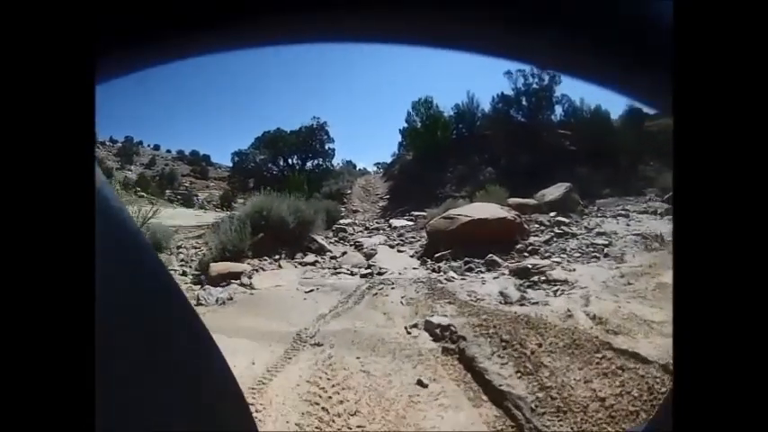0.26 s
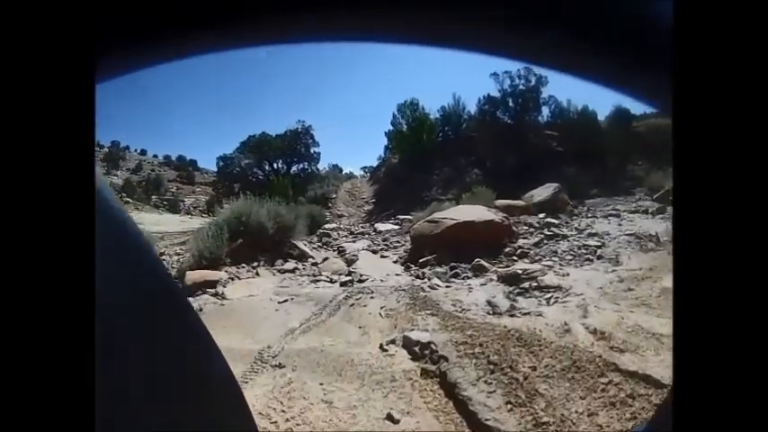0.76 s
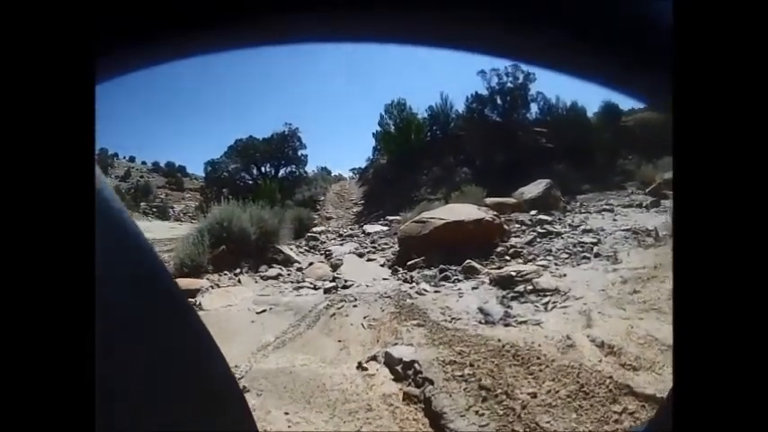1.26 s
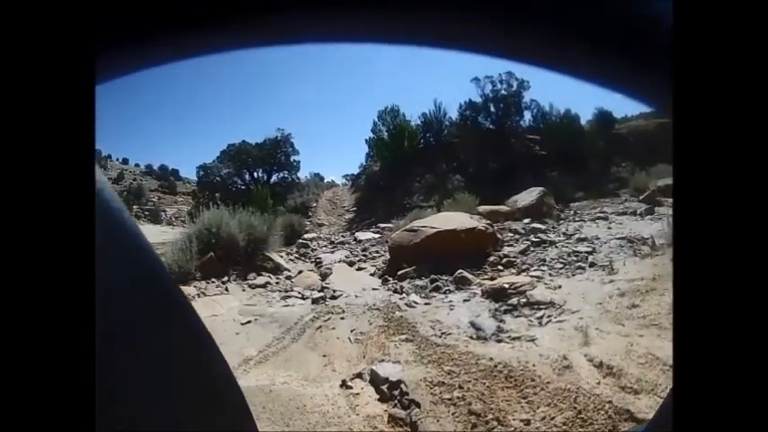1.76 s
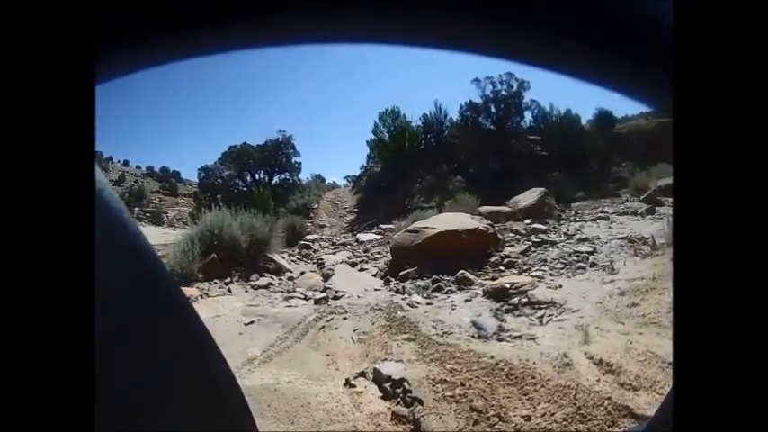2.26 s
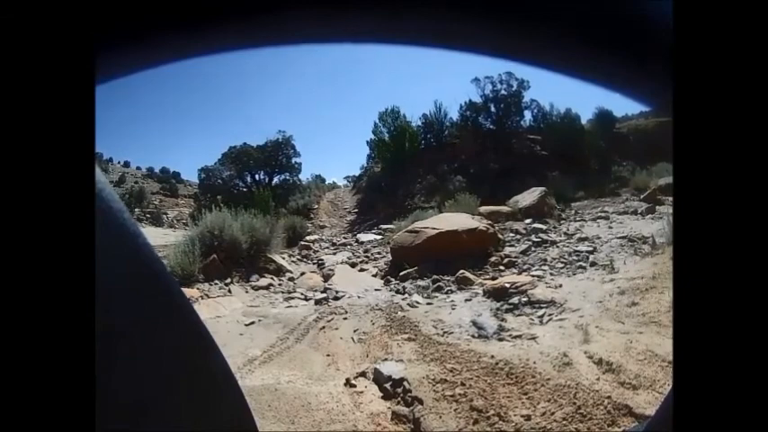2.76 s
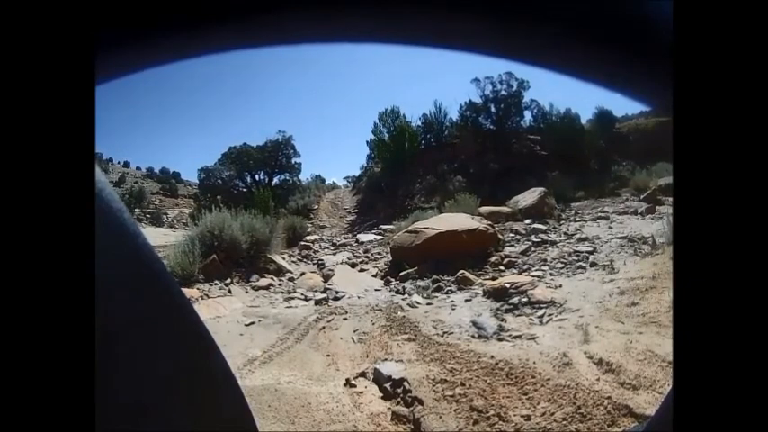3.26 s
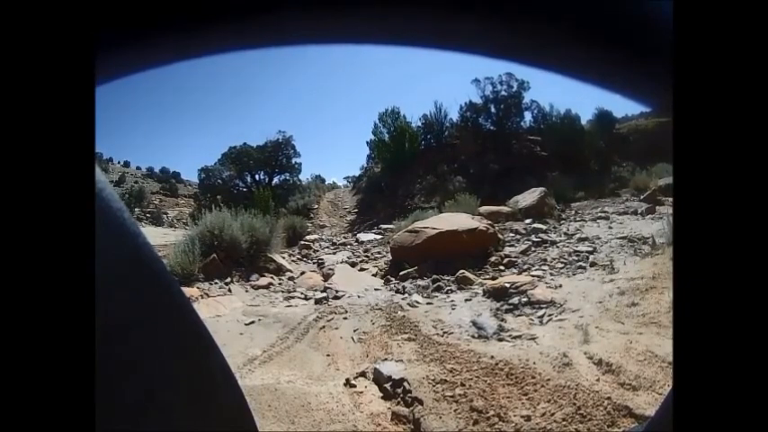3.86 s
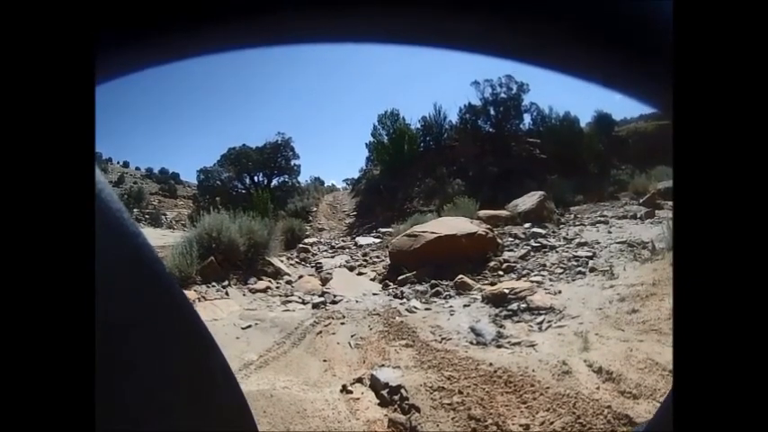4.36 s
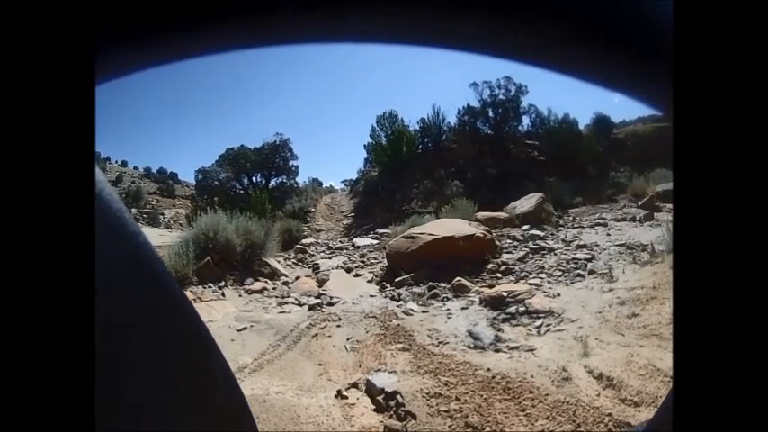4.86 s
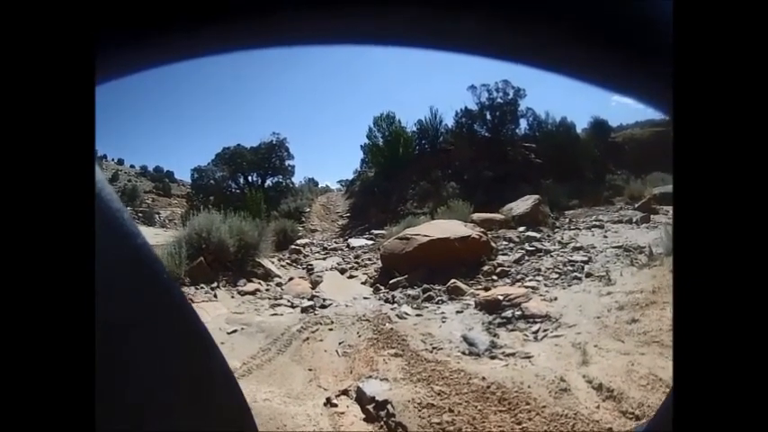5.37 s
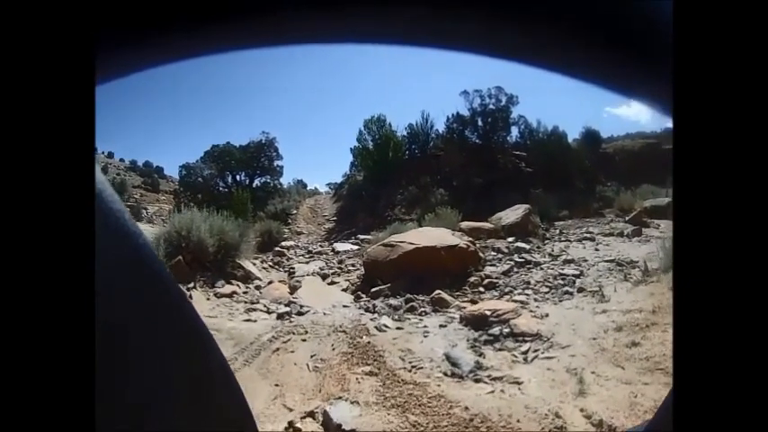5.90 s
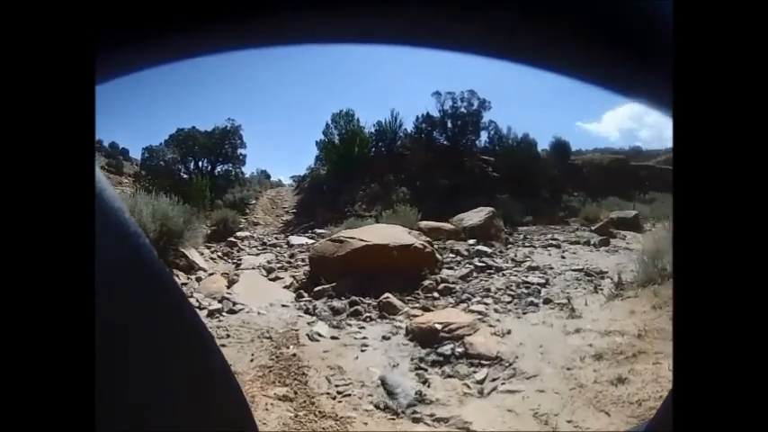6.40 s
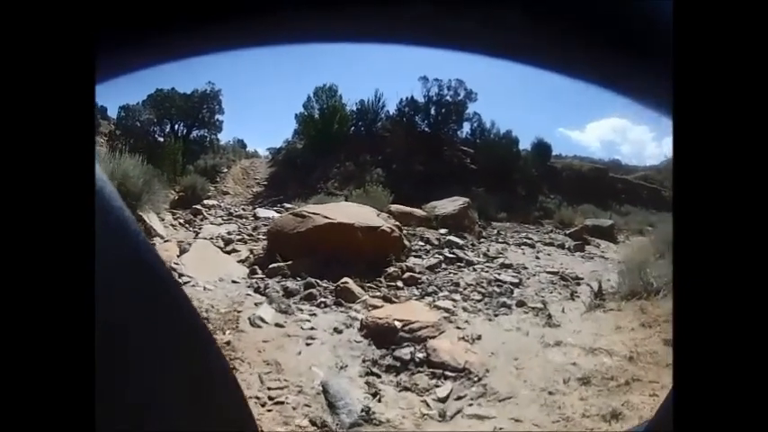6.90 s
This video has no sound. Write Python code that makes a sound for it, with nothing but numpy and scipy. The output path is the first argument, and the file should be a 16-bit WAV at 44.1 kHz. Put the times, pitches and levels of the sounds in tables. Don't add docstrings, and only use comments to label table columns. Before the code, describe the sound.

From 0 to about 3.6 seconds a two-cylinder off-road engine idles slowly, close and muffled: soft low exhaust throbs around 50 Hz, slightly uneven, over unsteady gas rumble. Valve gear clatters twice each cycle, tappets tick finely, air hisses faintly, and a body panel hums in short swells around 300 Hz. At 3.7 the engine stumbles and revs, reaching full pull by 4.3, about half again higher in pitch and far louder, with thick, compressed bass. A loose metal part rattles in quick dry strikes from about 4 seconds, growing brighter after 6.2. Small stones tick on metal at about 6.1 and, very faintly, 6.35. From 6.25 the speed falls quickly; the throbs turn weak and lumpy, with a few stray rattles, settling to low idle by 7.1. The small microphone is sealed in a housing, outdoors, with only faint self-noise.

```python
import sys
import numpy as np
from scipy import signal
from scipy.fft import rfft, irfft, next_fast_len
from scipy.io import wavfile
from scipy.ndimage import uniform_filter1d, map_coordinates

SR = 44100
rng = np.random.default_rng(int(sys.argv[2]) if len(sys.argv) > 2 else 0)


def to_linear_factor(level_db):
    exponent = np.asarray(level_db, float) / 20
    return 10 ** exponent


def wav_record(signal):
    frames = np.transpose(np.atleast_2d(signal))
    bounded = np.clip(frames, -1, 1)
    quanta = np.round(bounded * 32767).astype(np.int16)
    wavfile.write(sys.argv[1], SR, quanta)


N = 314874


def unit(x):
    return x / np.sqrt(np.mean(x ** 2) + 1e-20)


def curves(rows):
    t_s, *columns = np.transpose(rows)
    return [np.interp(np.arange(N) / SR, t_s, column) for column in columns]


def wobble(rate_hz):
    coarse = np.arange(0, N + 64, 64)
    knots = coarse * np.clip(rate_hz, 0, 50) / SR
    return np.interp(np.arange(N), coarse, map_coordinates(rng.standard_normal(400), [knots]))


def resonance_db(f_hz, modes):
    return sum(top_db / (1 + ((f_hz - centre) / width * 2) ** 2) for centre, width, top_db in modes)


def spell(start_s, length_s):
    return np.exp(-((np.arange(N) / SR - start_s) / length_s * 2) ** 2)


def bump(cycle, angle, rise, fall):
    u = (cycle - angle) % 1
    return (1 - np.exp(-u / rise)) * np.exp(-u / fall)


# t/s, speed/Hz
SPEED = [(0.0, 13.28), (0.72, 12.561), (1.0, 12.981), (1.84, 12.894), (2.1, 12.409), (2.98, 12.97),
         (3.4, 12.675), (3.7, 13.768), (4.1, 18.355), (4.34, 19.1), (4.84, 18.978), (5.42, 20.058),
         (5.68, 19.945), (6.2, 20.136), (6.3, 19.002), (6.4, 16.556), (6.82, 13.072), (7.14, 11.961)]


def engine_speed():
    return curves(SPEED)[0]


# t/s, load/0-1, firing unevenness/dB
THROTTLE = [
    (0, 0, 1.6),
    (3.5, 0, 1.6),
    (4.05, 1, .6),
    (4.3, 1, .4),
    (6.25, 1, .4),
    (6.37, .5, 2.5),
    (6.55, .3, 3),
    (7.14, 0, 2.5),
]


def throttle():
    load, rough_db = curves(THROTTLE)
    return np.clip(load, 0, 1), rough_db


# t/s, push/dB
PUSH = [(0, -23), (.25, -29), (.72, -25), (1.38, -30.5), (1.9, -29.5), (2.07, -23.5), (2.3, -25),
        (2.43, -29), (2.6, -24.5), (3.12, -33), (3.3, -25.5), (3.6, -34), (4.12, -14.5), (5.5, -11.5),
        (6.22, -11.5), (6.4, -22), (6.75, -23.5), (7.14, -35)]


def firing_push():
    push_db = curves(PUSH)[0]
    return push_db, push_db + 27


def noise_db(load, idle_db, per_doubling_db, load_db, push_share, surge_db):
    idle_hz, shudder_lag_s = 12.8, 0.1
    speed, t = uniform_filter1d(engine_speed(), size=SR // 8), np.arange(N) / SR
    shudder = np.interp(t - shudder_lag_s, t, load * abs(np.gradient(speed)) * SR)
    running_db = idle_db + per_doubling_db * np.log2(speed / idle_hz) + load_db * load
    return running_db + push_share * firing_push()[1] + surge_db * shudder


def rumble_db(load):
    return noise_db(load, -37.5, 4.5, 3.5, 0.088, 0.32)


def hiss_db(load):
    return noise_db(load, -65, 11, 3.5, 0.02, 0.1)


# order, idle level/dB, share of idle push, level over push under load/dB
THROB = [(2, -43, .1, -9.7), (3, -41, .2, -16), (4, -27, 1, -13), (5, -41, .2, -21)]
# f/Hz, width/Hz, level/dB
PIPE = [(41, 16, 9), (77.5, 13, 9), (100, 8, 5)]
# t/s, length/s, order, level/dB
ORDER_SWELLS = [(.1, .25, 3, -33), (.4, .9, 5, -35), (1.4, .7, 5, -38), (1.7, .5, 3, -35), (2.62, .15, 3, -33),
                (3.05, .3, 3, -37), (3.82, .35, 3, -24.5), (3.82, .4, 5, -26), (3.8, .25, 2, -27),
                (6.5, .15, 2, -28), (6.55, .25, 3, -33), (6.63, .2, 5, -33), (6.94, .18, 3, -27),
                (7.03, .25, 5, -31)]


def throb(load):
    push_db, excess_db = firing_push()
    speed = engine_speed()
    levels = []
    for order, (_, idle_db, share, load_db) in enumerate(THROB, start=2):
        idling_db = idle_db + share * excess_db
        pulling_db = push_db + load_db + resonance_db(order * speed, PIPE)
        steady = to_linear_factor((1 - load) * idling_db + load * pulling_db)
        swells = sum(to_linear_factor(db) * spell(s, length) for s, length, k, db in ORDER_SWELLS if round(k) == order)
        levels.append(20 * np.log10(steady + swells))
    return levels


# order, idle level/dB, level pulling slowly/dB, level pulling fast/dB
BARK = [(6, -41, -37, -43), (7, -39, -42, -42), (8, -44, -40, -42), (9, -47, -52, -42), (10, -47, -44, -45),
        (11, -46, -43, -49), (12, -56, -43, -45), (13, -64, -53, -45), (14, -59, -47, -51),
        (15, -56, -49, -47), (16, -53, -46, -47), (17, -60, -51, -52), (18, -64, -52, -50),
        (19, -59, -57, -58), (20, -66, -51, -52), (21, -70, -54, -52), (22, -66, -52, -57),
        (23, -66, -53, -56), (24, -70, -63, -61), (25, -70, -60, -60), (26, -72, -60, -66)]


def bark(load, rough_db):
    slow_hz, fast_hz = 19.1, 19.9
    fast = np.clip((engine_speed() - slow_hz) / (fast_hz - slow_hz), 0, 1)
    effort_db = rumble_db(load) - (-39 + 8 * load) - 4 * np.maximum(rough_db - 1.6, 0)
    levels = []
    for _, idle_db, slow_db, fast_db in BARK:
        pulling_db = slow_db + fast * (fast_db - slow_db)
        levels.append((1 - load) * idle_db + load * pulling_db + effort_db + 2.2 * wobble(4))
    return levels


def exhaust(cycle, load, rough_db):
    out = np.zeros(N)
    for order, db in enumerate(throb(load) + bark(load, rough_db), start=2):
        slip = (.03 * rough_db + .004 * order) * wobble(9)
        scatter = rng.random()
        dip_turn = order * (cycle - .345) + scatter * (order > 8)
        peak_turn = order * (cycle - .52 - .18 / order ** 2) + scatter * (order > 6)
        both = load * np.exp(2j * np.pi * peak_turn) - (1 - load) * np.exp(2j * np.pi * dip_turn)
        wave = both / (abs(both) + 0.016) * np.exp(2j * np.pi * slip)
        out += to_linear_factor(db + rough_db * wobble(12)) * np.sqrt(2) * wave.real
    muffler_limit = .66
    return out / (1 + abs(out / muffler_limit) ** 6) ** (1 / 6)


# f/Hz, width/Hz, level/dB
CASE = [(199, 34, 6.5), (310, 19, 3), (565, 7.8, 6.5), (757, 140, 4.5), (1008.5, 43, 6.5), (1353, 32, 3.5),
        (1595, 41, 5), (1766, 61, 9), (2026, 40, 3), (2180, 100, 2.5), (4320, 410, 5), (5350, 83, 7),
        (3635, 42, 4.5), (5770, 70, 5), (6130, 60, 7), (6720, 80, 6)]


def coloured(x, spectrum):
    size = next_fast_len(N + 8192)
    hz = np.fft.rfftfreq(size, 1 / SR) + 1
    f, db = np.transpose(spectrum)
    gain_db = np.interp(np.log(hz), np.log(f), db) + resonance_db(hz, CASE)
    return unit(irfft(rfft(x, size) * to_linear_factor(gain_db), size)[:N])


def grains(spiky_db):
    jumps = uniform_filter1d(rng.standard_normal(N), 60) * np.sqrt(60)
    return rng.standard_normal(N) * to_linear_factor(spiky_db * jumps)


# f/Hz, density/dB per Hz
RUMBLE = [(13, -36.5), (22, -8), (43, -10), (70, -8), (238, -20.5), (307, -20), (353, -18.5), (504, -27.5),
          (548, -42.5), (650, -32), (840, -73.5), (1430, -120)]


def rumble(load):
    noise = coloured(rng.standard_normal(N) * to_linear_factor(wobble(8)), RUMBLE)
    return to_linear_factor(rumble_db(load) - 3.5 * load - 3.0) * noise


def valve_swell(cycle):
    return .23 + bump(cycle, .9, .05, .28) + bump(cycle, .38, .04, .28)


# f/Hz, density/dB per Hz
CLATTER_IDLE = [(260, -21.5), (450, -7.5), (563, -9), (596, -16), (751, -10.5), (882, -7.5), (994, -3.5),
                (1080, -9.5), (1170, -2.5), (1770, -5), (1920, -11.5), (2180, -8.5), (3050, -19.5),
                (3960, -57.5), (6710, -120)]
# f/Hz, density/dB per Hz
CLATTER_LOAD = [(260, -12), (450, -2), (625, -11), (769, -4), (910, -7), (1110, -5.5), (1310, 0.5),
                (1610, -0.5), (1780, -7.5), (1930, -6), (2140, -7.5), (2640, -8.5), (3050, -20),
                (3960, -46.5), (6710, -120)]


def clatter(cycle, load):
    source = grains(1.1) * to_linear_factor(.8 * wobble(30))
    loaded_swell = 0.38 + bump(cycle, .76, 0.067, 0.12) + 0.41 * bump(cycle, 0.22, 0.015, 0.071)
    idling = coloured(source * valve_swell(cycle), CLATTER_IDLE)
    pulling = coloured(source * loaded_swell, CLATTER_LOAD)
    level_db = noise_db(load, -43.5, 5.5, 2, 0.0317, 0.1567) + 2.0
    return to_linear_factor(level_db) * ((1 - load) * idling + load * pulling)


LULLS = [0.48, .58, 1.073, 1.331, 1.395, 1.8, 2.313, 4.613, 6.943]


def lulls():
    return sum(np.exp(-((np.arange(N) / SR - s) / .011) ** 4) for s in LULLS)


# f/Hz, density/dB per Hz
TAPPETS = [(4200, -47), (5000, 0), (5800, 2.5), (6900, -1.5), (7600, -9), (8300, -26.5), (12000, -28),
           (15000, -36), (16000, -120)]


def tappets(cycle, load):
    ticks = .15 + bump(cycle, .86, .01, .12) + bump(cycle, .36, .01, .2)
    level_db = hiss_db(load) - 7.5 - 8.4 * load - 20 * lulls()
    return to_linear_factor(level_db) * coloured(grains(1.6) * ticks, TAPPETS)


# f/Hz, density/dB per Hz
HISS = [(2400, -29), (3200, 1.5), (3800, -11), (4400, -3), (5000, -11.5), (6500, -19), (7400, -16),
        (8200, -26.5), (11000, -29.5), (15000, -52), (16000, -120)]


def hiss(cycle, load):
    flow = 1.2 + (1 - load) * valve_swell(cycle) + load * bump(cycle, .82, .04, 0.13)
    source = grains(1.5) * flow * to_linear_factor(0.78 * wobble(25))
    return to_linear_factor(hiss_db(load) + 2.5 - 8 * lulls()) * coloured(source, HISS)


# f/Hz, density/dB per Hz
MIC_NOISE = [(3000, -36), (7000, -3), (9000, -2), (12000, -8), (14500, -6.5), (15200, -13.5), (15500, -30),
             (16000, -120)]


def mic_noise():
    return to_linear_factor(-76.0 - 20 * lulls()) * coloured(rng.standard_normal(N), MIC_NOISE)


# t/s, length/s, level/dB
SHAKES = [(0.201, 0.23, 5.5), (0.705, .3, 6), (1.152, 0.21, 6), (1.47, 0.18, 9), (1.75, .15, 2),
          (2.12, .3, 3.5), (2.42, 0.3, 7), (2.668, 0.26, 8.5), (3.204, 0.54, 4), (4.158, .1, 6),
          (5.6, .2, 5), (5.951, 0.33, 4)]


def panel(load):
    turn = np.cumsum(303 + 3 * wobble(9)) / SR
    shake_db = sum(db * spell(s, length) for s, length, db in SHAKES)
    return to_linear_factor(-52 + 6 * load + shake_db + 1.5 * wobble(9.1)) * np.sin(2 * np.pi * turn)


def ring(modes):
    t = np.arange(SR // 25) / SR
    out = np.zeros(len(t))
    for k, (hz, db, t60_s) in enumerate(modes):
        decay = to_linear_factor(db + rng.normal(0, 1) - 60 * t / t60_s)
        out += (-1) ** k * decay * np.sin(2 * np.pi * hz * rng.normal(1, .012) * t)
    contact_s = .0007
    return out * (1 - np.exp(-t / contact_s)) ** 3


# t/s, peak level/dB
STRIKES = [(3.9727, -34), (4.0873, -29), (4.142, -30), (4.1811, -27.5), (4.196, -28),
           (4.2105, -35.5), (4.234, -22.5), (4.2489, -23.5), (4.2869, -24), (4.3019, -28.5),
           (4.3408, -24), (4.3551, -28), (4.3933, -25.5), (4.4064, -28.5), (4.4452, -27.5),
           (4.4585, -30), (4.4978, -24.5), (4.5122, -32), (4.5499, -22.5), (4.563, -27),
           (4.602, -23), (4.6169, -26.5), (4.6309, -32), (4.6552, -21.0), (4.669, -25.5),
           (4.6842, -36.5), (4.6942, -30.5), (4.708, -22.5), (4.7223, -28.5), (4.747, -30),
           (4.7605, -22.5), (4.7746, -28), (4.7984, -28.5), (4.8125, -28), (4.8261, -34.5),
           (4.851, -30.5), (4.864, -24.5), (4.879, -29),
           (4.9036, -28.5), (4.9169, -25), (4.931, -25.5), (4.9466, -34.5), (4.9693, -23),
                   (4.9843, -26), (4.9994, -32), (5.0221, -23.5), (5.036, -30.5), (5.051, -34.5),
                   (5.0736, -25), (5.1102, -35.5), (5.1251, -25), (5.1758, -28.5), (5.2121, -35.0),
                   (5.2264, -30), (5.263, -34.0), (5.2769, -24.5), (5.3026, -32.5), (5.3134, -32),
                   (5.3265, -23), (5.3639, -33.0), (5.3774, -24.5), (5.414, -32.5), (5.4275, -24.5),
                   (5.4543, -33), (5.4776, -25.0), (5.5042, -29.5), (5.5142, -35.0), (5.5275, -27.5),
                   (5.5391, -30.5), (5.5537, -27), (5.5633, -27), (5.5771, -29), (5.5882, -29.5),
                   (5.6022, -31), (5.6138, -24), (5.627, -25.5), (5.6388, -31.5), (5.6635, -30.5),
                   (5.677, -25),
           (5.7034, -34), (5.7139, -29), (5.7271, -26), (5.7392, -31), (5.754, -30.5),
                        (5.7886, -26.0), (5.8027, -33.5), (5.8388, -25.5), (5.8517, -26.5), (5.888, -23.5),
                        (5.9023, -28.5), (5.9394, -32.5), (5.9532, -29), (5.9759, -34.5), (5.99, -27),
                        (6.002, -32.5), (6.0382, -27), (6.064, -29.5), (6.0894, -25.5), (6.1021, -30),
                        (6.114, -33.5), (6.1388, -31.5), (6.1634, -28.0), (6.1878, -25.5), (6.2142, -22),
                        (6.2389, -24.0), (6.2521, -32), (6.2644, -20.5), (6.2792, -25.5), (6.292, -24.0),
                        (6.3063, -29), (6.319, -27.0), (6.3331, -23.5), (6.348, -27), (6.3637, -22),
                        (6.3918, -33.5), (6.4073, -23), (6.4242, -25.5),
           (6.5691, -26), (6.5996, -34), (6.6346, -30), (6.6517, -33.5), (6.6661, -31.5),
                      (6.7017, -26), (6.7324, -34.5), (7.1215, -30.5)]
# f/Hz, level/dB, t60/s
RING_LOW = [(1340, 0, .016), (1720, 0, .016), (560, -9, .02), (950, -8, .014)]
# f/Hz, level/dB, t60/s
RING_MID = [(2650, 0, .013), (2370, -6, .012), (3300, -15, .011)]
# f/Hz, level/dB, t60/s
RING_HIGH = [(4400, -3, .015), (5250, -4, .014), (6400, -10, .008)]


def rattle():
    out, loosens_s = np.zeros(N + SR), 6.18
    for when, db in STRIKES:
        sound = ring(RING_MID)
        sound += to_linear_factor(-3.0 + rng.normal(0, 0.7)) * ring(RING_LOW)
        sound += to_linear_factor(-29 + 7 * (when > loosens_s)) * ring(RING_HIGH)
        out[round(when * SR):][:len(sound)] += to_linear_factor(db + 8.0) * sound
    return out[:N]


# t/s, peak level/dB
STONES = [
    (6.061, -36),
    (6.3409, -45.5),
    (6.387, -46),
]
# f/Hz, level/dB, t60/s
RING_STONE = [(3800, -2, .014), (4200, 0, .016), (4580, -2, .014), (7000, -22, .006), (9500, -30, .005)]


def stones():
    out = np.zeros(N + SR)
    for when, db in STONES:
        sound = ring(RING_STONE)
        out[round(when * SR):][:len(sound)] += to_linear_factor(db + 7) * sound
    return out[:N]


def scene():
    cycle = np.cumsum(engine_speed()) / SR
    load, rough_db = throttle()
    mix = exhaust(cycle, load, rough_db) + rumble(load) + clatter(cycle, load)
    mix += tappets(cycle, load) + hiss(cycle, load) + mic_noise()
    mix += panel(load) + rattle() + stones()
    return mix[None]


def low_pass(x):
    return signal.sosfilt(signal.butter(12, 15300, fs=SR, output="sos"), x)


def record(dry):
    return low_pass(dry)


dry = scene()
out = record(dry)
wav_record(out)
```